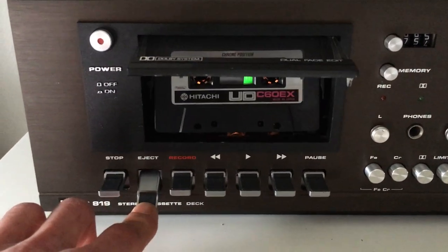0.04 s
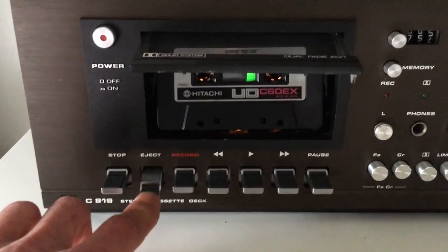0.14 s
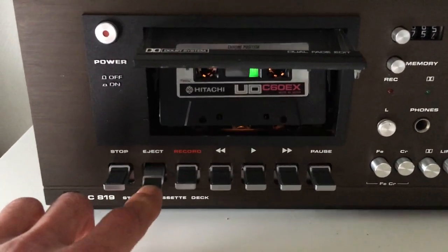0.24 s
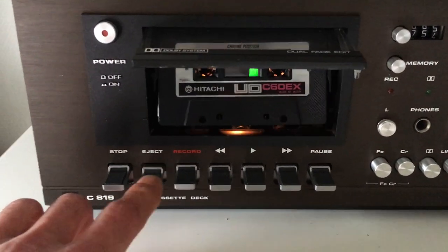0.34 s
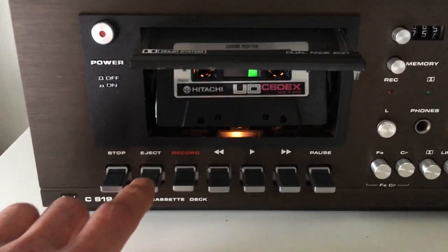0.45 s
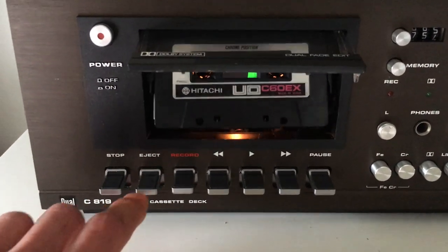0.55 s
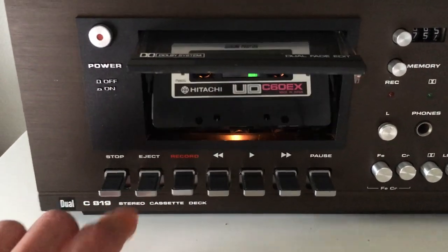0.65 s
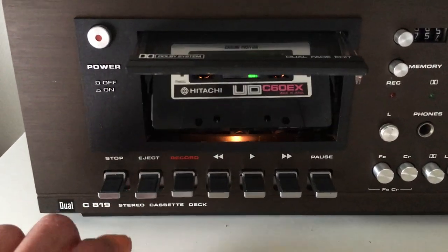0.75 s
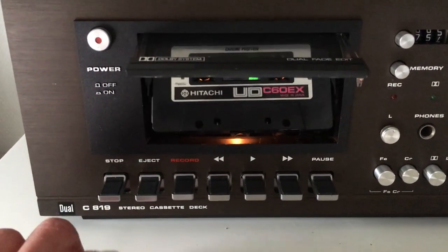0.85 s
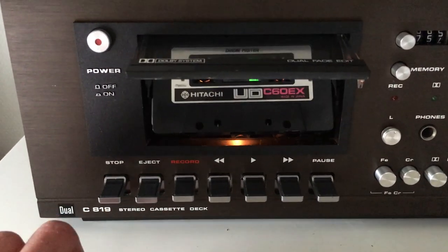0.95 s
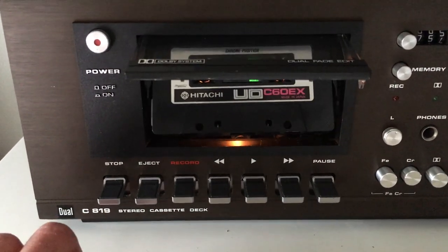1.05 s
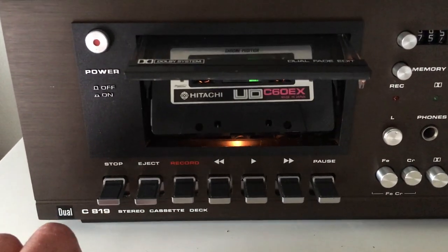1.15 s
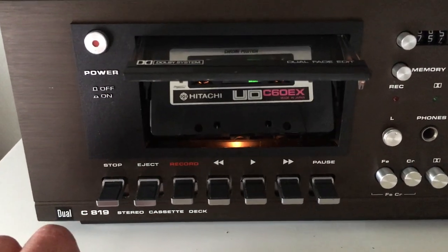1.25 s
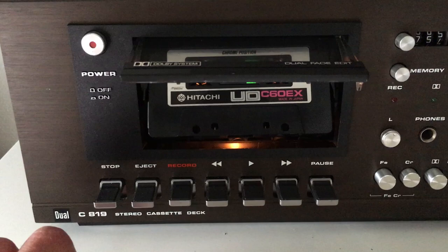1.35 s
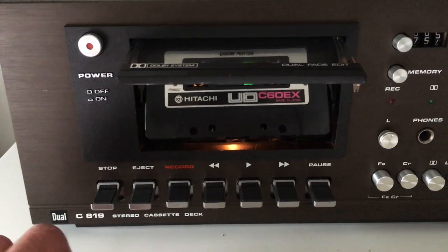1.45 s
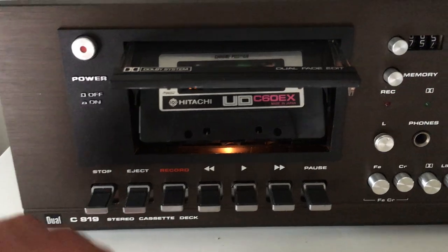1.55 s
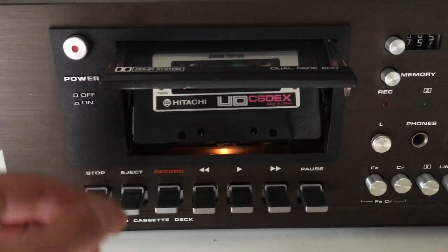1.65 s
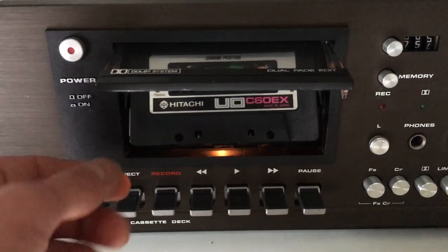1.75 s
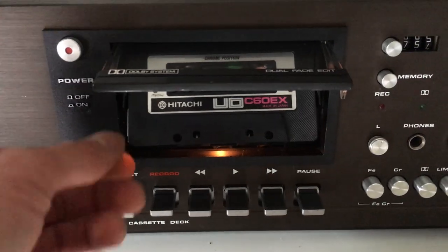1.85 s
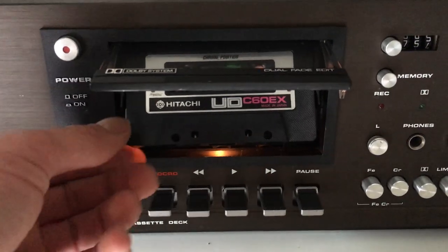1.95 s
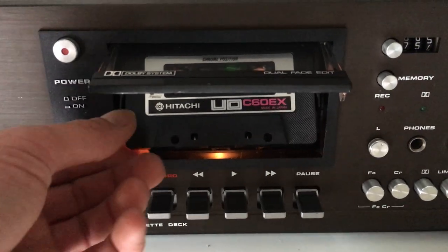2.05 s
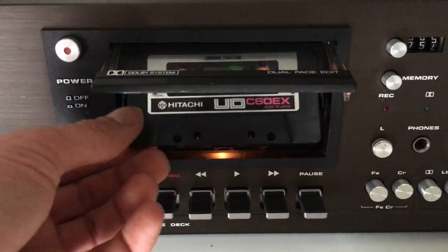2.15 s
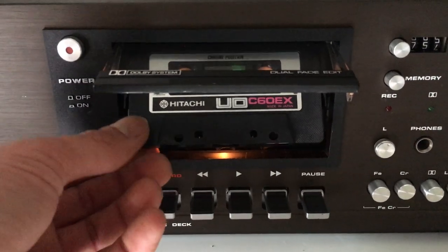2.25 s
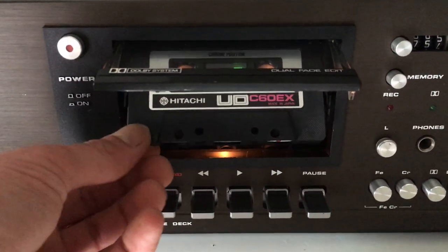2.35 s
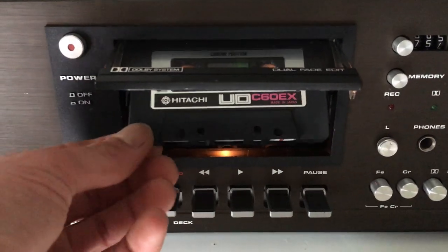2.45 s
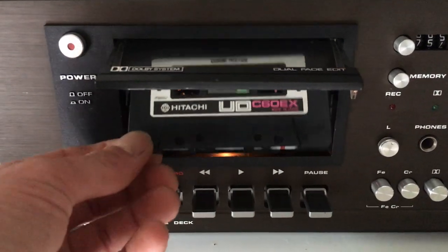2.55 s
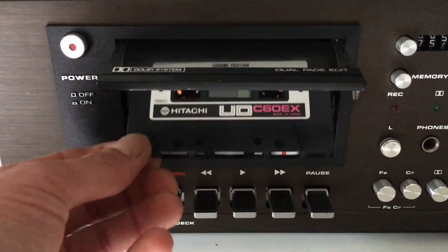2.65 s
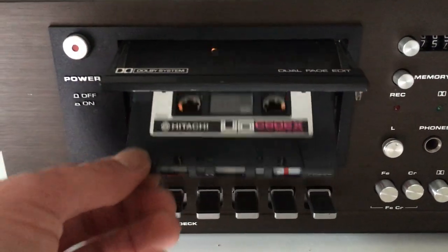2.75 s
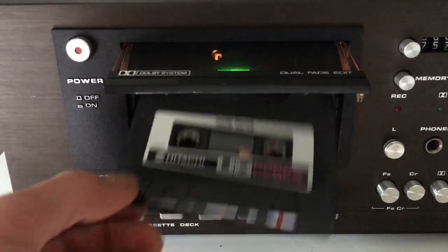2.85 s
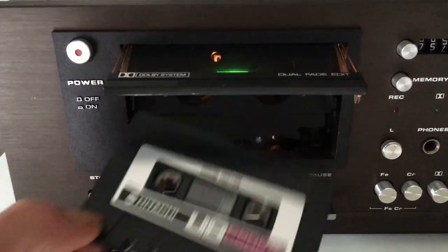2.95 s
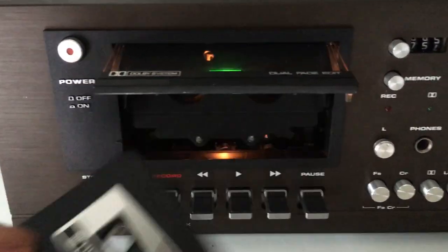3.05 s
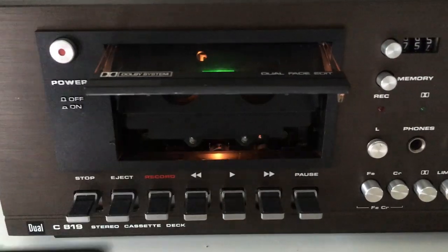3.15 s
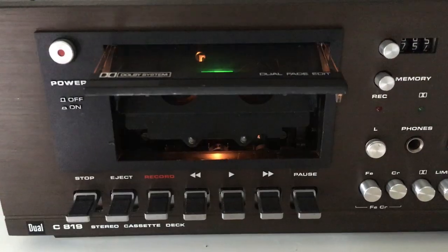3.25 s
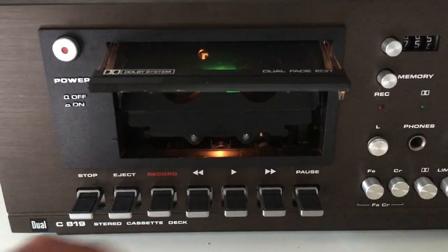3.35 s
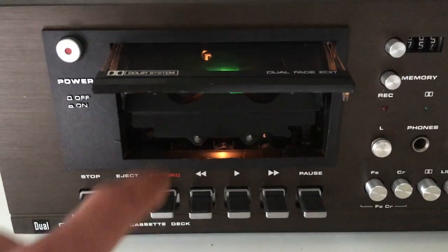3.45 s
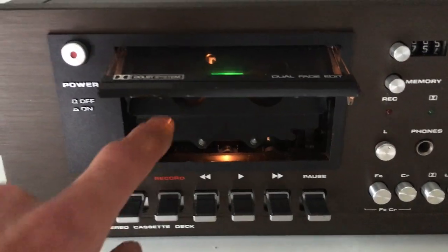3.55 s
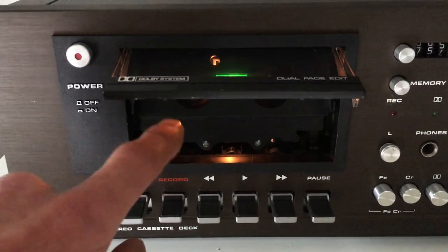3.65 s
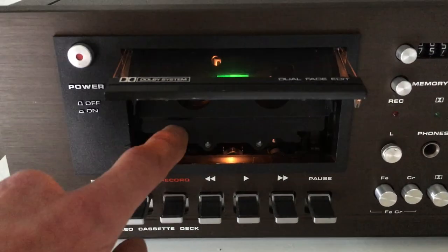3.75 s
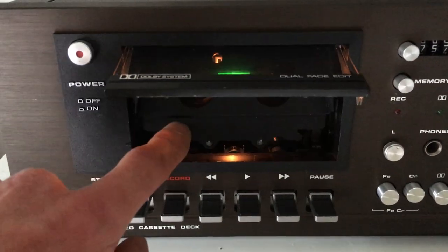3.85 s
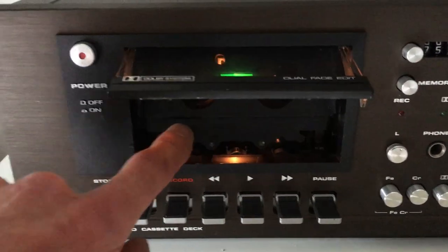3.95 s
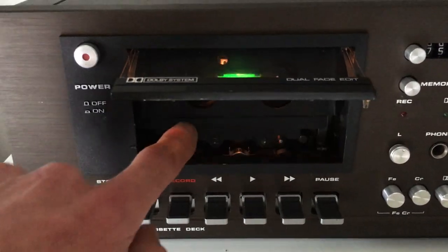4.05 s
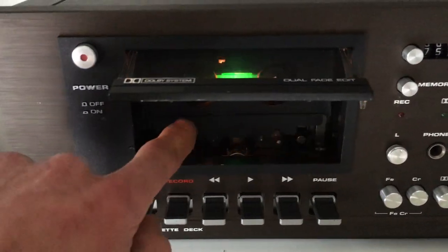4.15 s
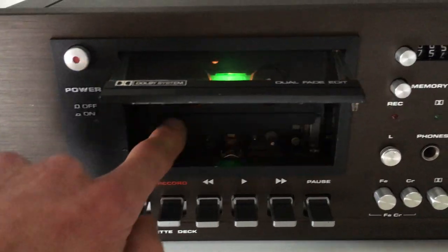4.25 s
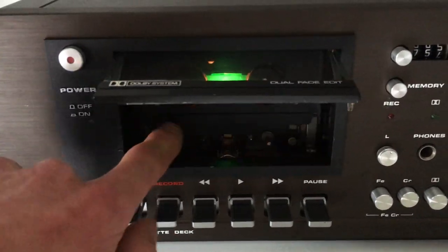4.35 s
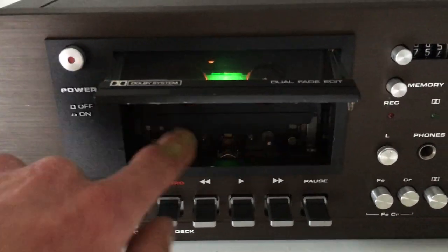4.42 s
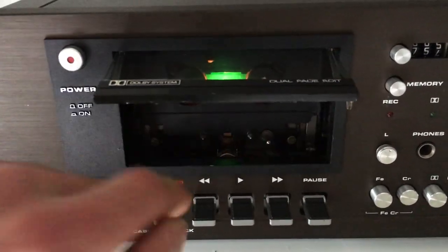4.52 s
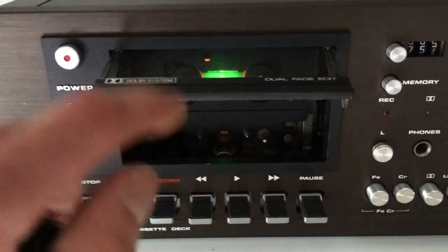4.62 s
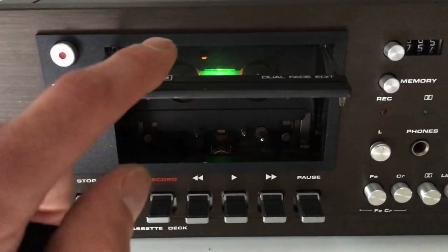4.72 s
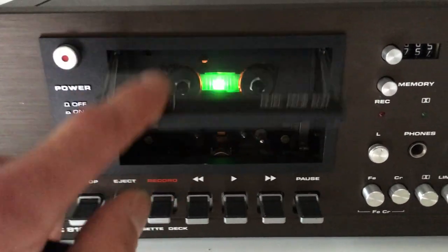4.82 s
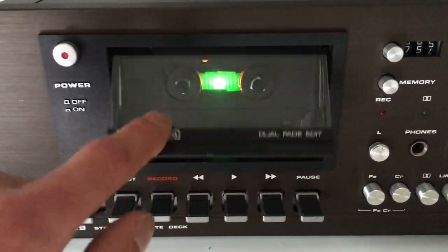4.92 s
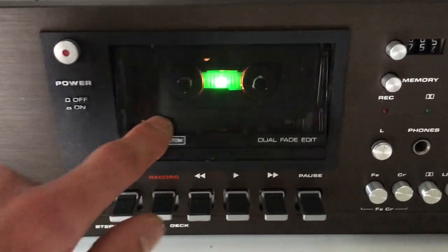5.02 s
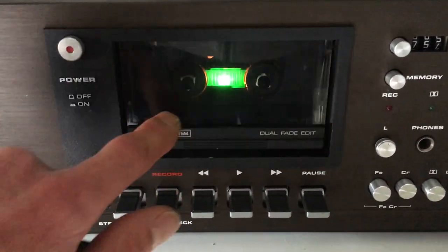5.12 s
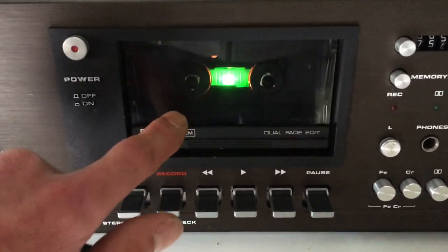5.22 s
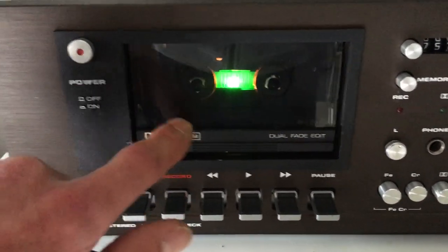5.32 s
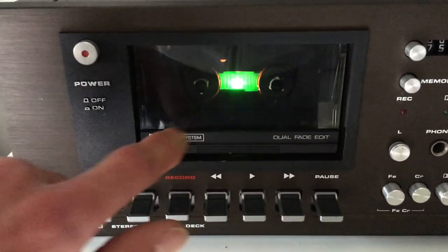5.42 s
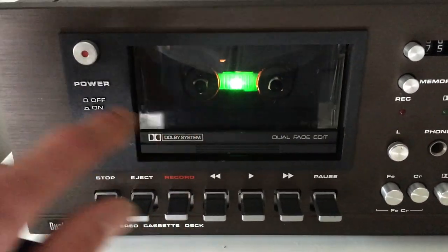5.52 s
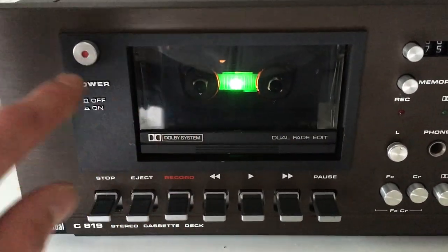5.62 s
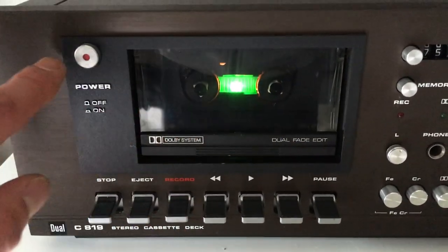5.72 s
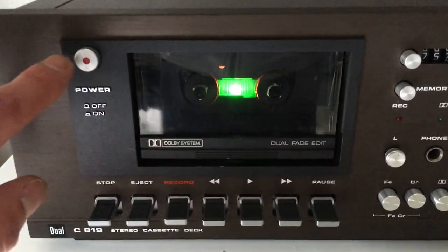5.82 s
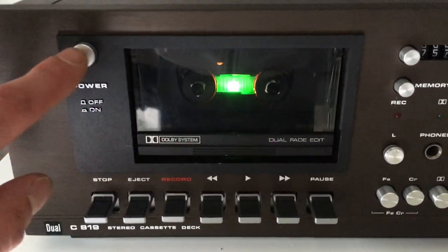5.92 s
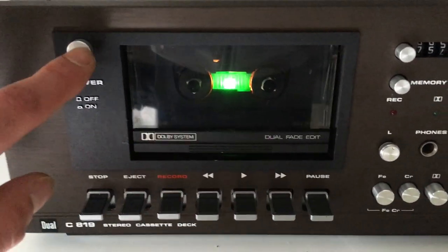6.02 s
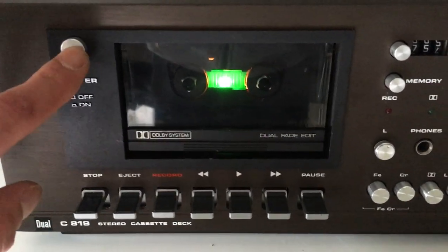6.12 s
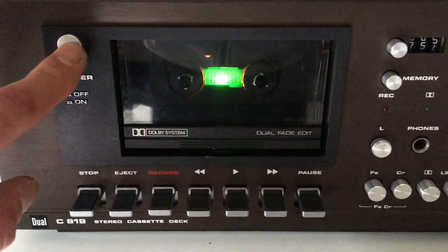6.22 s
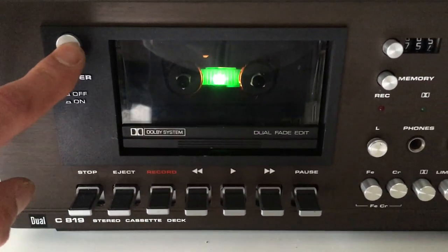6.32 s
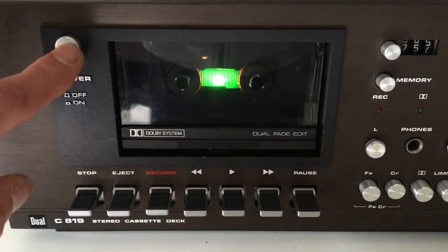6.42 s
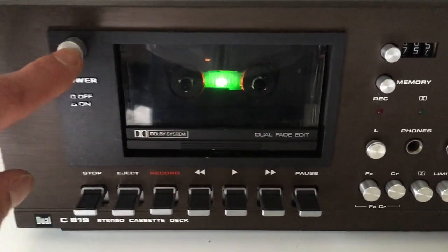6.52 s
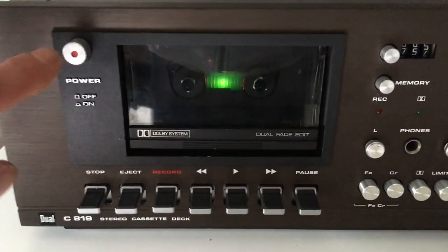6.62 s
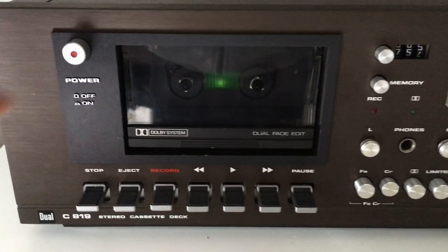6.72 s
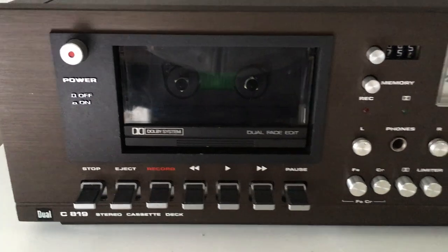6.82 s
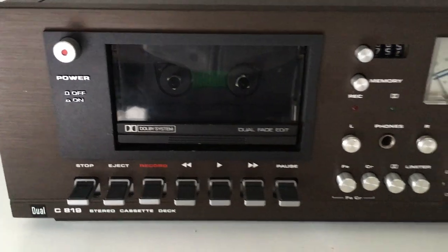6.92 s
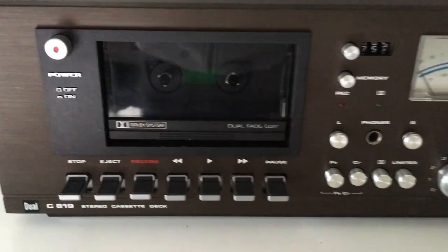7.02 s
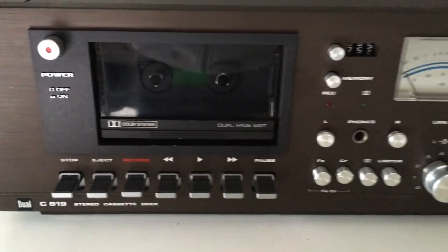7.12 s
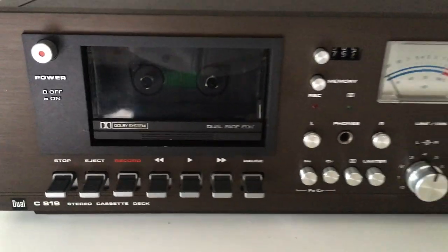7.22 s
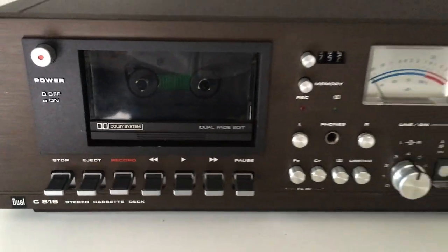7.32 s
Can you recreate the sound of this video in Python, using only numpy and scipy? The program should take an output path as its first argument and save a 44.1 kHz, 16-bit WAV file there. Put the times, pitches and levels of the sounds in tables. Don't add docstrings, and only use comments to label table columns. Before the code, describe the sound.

Close mechanical clicks in a quiet room: eject key, spring thump, plastic tape sliding out, one very loud snap, door clack, switch press and release.

```python
import sys
import numpy as np
from scipy import signal
from scipy.fft import rfft, irfft, next_fast_len
from scipy.io import wavfile
from scipy.ndimage import uniform_filter1d, map_coordinates

SR = 44100
rng = np.random.default_rng(int(sys.argv[2]) if len(sys.argv) > 2 else 0)


def boost_factor(decibels):
    exponent = np.asarray(decibels, float) / 20
    return 10 ** exponent


def log_audio(samples):
    frames = np.atleast_2d(samples).T
    limited = np.clip(frames, -1, 1)
    pcm = np.round(limited * 32767).astype(np.int16)
    wavfile.write(sys.argv[1], SR, pcm)


N = 325017
HZ = np.fft.rfftfreq(next_fast_len(N + SR), 1 / SR)

# low edge f/Hz, high edge f/Hz
BANDS = [(9000, 19000), (4500, 9000), (1200, 4500), (280, 1200)]
# f/Hz, width/Hz, level/dB
HAND_BODY = [(1390, 220, 4.7), (2000, 410, 9), (4300, 55, 1.8), (6860, 420, 10.7), (9040, 1200, 6.6),
             (13400, 3100, 8.8)]
# f/Hz, width/Hz, level/dB
SWITCH_BODY = [(1000, 33, 17), (1645, 45, 21.6), (1980, 140, 14.4), (2560, 400, 20.6), (3750, 310, 11),
               (5960, 360, 18.5), (7250, 1700, 7.7), (9550, 340, 16.7), (11300, 610, 11.6),
               (13900, 1700, 16.5)]


def unit(x):
    return x / np.sqrt(np.mean(np.abs(x) ** 2) + 1e-20)


def along(points, hz):
    f, v = np.transpose(points)
    return np.interp(np.log(hz + 1), np.log(f + 1), v)


def filtered(x, response):
    m = 2 * (len(HZ) - 1)
    return irfft(rfft(x, m) * response, m)[..., :N]


def wobble(rate):
    knots = rng.standard_normal(int(N * rate / SR) + 4)
    return map_coordinates(knots, [np.arange(N) * rate / SR])


def band_edge(u):
    return 1 / (1 - u * u + 1j * np.sqrt(2) * u)


def voiced(drive, body):
    response = 1
    for k, (center, width, db) in enumerate(body):
        damping = 1j * HZ * width
        response = response + (-1) ** k * boost_factor(db) * damping / (center * center - HZ * HZ + damping)
    split = []
    for low, high in BANDS:
        band = band_edge(HZ / high / 1.12) * band_edge(-low / 1.13 / (HZ + 1))
        split.append(unit(response * band ** 2))
    return filtered(drive, np.array(split)).sum(axis=0)


def struck(contacts, body, rattle_s, snap_db, knock_db, rise_s=0.00039):
    drive = np.zeros((len(BANDS), N + SR))
    t = np.arange(SR // 10) / SR
    noise = rng.standard_normal((len(contacts), len(BANDS), len(t)))
    t60 = rattle_s * np.array([[.58], [.75], [1.1], [1.5]])
    for (s, db, hard_db, thud_db), grit in zip(contacts, noise):
        start = round(s * SR)
        level_db = np.array([db + hard_db, db + snap_db, db - hard_db, thud_db])
        fade = boost_factor(level_db[:, None] + 1.5 - 60 * t / t60)
        drive[:, start:start + len(t)] += fade * (1 - np.exp(-t / rise_s)) * grit
        drive[:, start] += boost_factor(level_db + knock_db)
    return voiced(drive[:, :N], body)


def slid(strokes, body, rough_db, air_db, low_db):
    ease_db = 18
    drive = np.zeros((len(BANDS), N))
    t = np.arange(N) / SR
    for start, firmest, end, db, hard_db in strokes:
        press_db = np.interp(t, [start, firmest, end], [-ease_db, 0, -ease_db], left=-120, right=-120)
        drive += boost_factor(db + press_db) * boost_factor([[hard_db + air_db], [hard_db], [0], [low_db - hard_db]])
    slips = unit(boost_factor(rough_db * wobble(300)))
    return voiced(drive * slips * rng.standard_normal(drive.shape), body)


def ringing(modes, beat_db, beat_rate, wander):
    out = np.zeros(N + SR)
    t = np.arange(SR) / SR
    knots = rng.standard_normal((len(modes), 2, 128))
    place = [np.clip(t * beat_rate, 0, 126)]
    for (s, db, hz, rise, t60), rows in zip(modes, knots):
        beat, turn = (map_coordinates(row, place) for row in rows)
        swell = boost_factor(db + beat_db * beat - 60 * t / t60) * (1 - np.exp(-t / rise))
        start = round(s * SR)
        out[start:start + SR] += swell * np.sin(2 * np.pi * hz * t + wander * turn)
    return out[:N]


def pushed(*parts):
    return [(s, db + mode_db, hz, rise, t60)
            for modes, pushes in parts
            for s, db, rise in pushes
            for hz, mode_db, t60 in modes]


def tray_snap():
    # t/s, strength/dB, hardness/dB, thud/dB
    tray_hits = [(3.772, -66.5, -5, -56), (3.868, -71, 11, -76), (4.005, -73, 2, -56),
                 (4.2213, -55, 8, -69.5), (4.2255, -58, 8.5, -63.5), (4.228, -54, 6, -59.5),
                 (4.234, -58.5, 3, -53), (4.2398, -37, 1, -46), (4.2412, -26, 6, -39.5),
                 (4.2442, -14.5, 8, -32), (4.2465, -18, 9, -29), (4.2488, -21, 4.5, -28.5),
                 (4.2512, -14.5, 6, -29), (4.2525, -15.5, 8.5, -36), (4.2543, -27, 4, -35),
                 (4.258, -26.5, 1.5, -32.5), (4.2615, -31, 3, -38.5)]
    # f/Hz, width/Hz, level/dB
    tray_body = [(417.6, 490, 2.5), (808.5, 58, 4.5), (1640, 120, 4.5), (2000, 220, 10), (2320, 250, 8),
                 (3900, 420, 11), (5587, 400, 1.5), (6400, 440, 8.5), (7900, 690, 4), (9560, 900, 9),
                 (11775, 890, 8.5), (14740, 1900, 8)]
    return struck(tray_hits, tray_body, rattle_s=0.015, snap_db=3.0, knock_db=11.5)


def eject_key():
    # t/s, strength/dB, hardness/dB, thud/dB
    key_hits = [
        (.161, -64, 9, -71),
        (.199, -79, -6, -58.5),
        (.2435, -66, -9.5, -54.5),
        (.2485, -74, -5.5, -57),
        (.3788, -49.5, 4.5, -62.5),
        (.398, -64.5, -5, -56.5),
        (.4055, -60, -2.5, -61),
        (.4145, -21, 4.5, -41),
        (.4185, -35, 5.5, -40),
    ]
    # f/Hz, width/Hz, level/dB
    key_body = [(1420, 350, -7.5), (2274, 150, 14), (3040, 130, 12), (4420, 190, 16), (5700, 250, 12.5),
                (6890, 690, 12.5), (8550, 530, 12), (10200, 600, 10.5), (11300, 930, 7), (13550, 900, 16)]
    return struck(key_hits, key_body, rattle_s=0.02, snap_db=0.0, knock_db=14.0)


def spring_lift():
    # t/s, strength/dB, hardness/dB, thud/dB
    lift_hits = [(.6195, -46.5, 3, -47), (.633, -52, 1, -42), (.6395, -48, 4, -42),
                 (.642, -50.5, 18, -41.5), (.648, -32, -4, -54), (.651, -43, -10, -50.5),
                 (.6567, -27.5, -3.5, -36.5), (.662, -41, -5, -42), (.667, -39, -1.5, -34.5),
                 (.672, -50, -1, -48), (.6805, -42, -2, -63), (.69, -49, -6, -60), (.6975, -60, 5, -67),
                 (.82, -65, -9, -69)]
    # f/Hz, width/Hz, level/dB
    lift_body = [(646, 71, 13.6), (970, 290, 12), (1750, 640, 13.4), (1880, 220, 19.2), (3300, 350, 1.7),
                 (4870, 130, 8.6), (5300, 370, 2), (8140, 140, 1), (13030, 1400, 4.1)]
    return struck(lift_hits, lift_body, rattle_s=0.019, snap_db=2.5, knock_db=16.5)


def door_shut():
    # t/s, strength/dB, hardness/dB, thud/dB
    door_hits = [(4.8512, -57, -6.5, -57), (4.857, -54.5, 2, -56), (5.081, -72, 9, -82.5),
                 (5.1238, -38, 4, -53), (5.1565, -45, -5, -47), (5.1618, -26, 3.5, -46),
                 (5.1635, -31.5, -4, -46), (5.1645, -30.5, -0.5, -48), (5.168, -44, -8, -60),
                 (5.171, -51, -5, -41), (5.3535, -60, -3, -54)]
    # f/Hz, width/Hz, level/dB
    door_body = [(984, 54, 8.3), (1286, 77, 10.1), (1620, 276, 6.7), (2400, 190, 16.6), (3620, 180, 8.05),
                 (4220, 210, 6.9), (5430, 240, 1), (11060, 400, 12), (14300, 1200, 4.4)]
    return struck(door_hits, door_body, rattle_s=0.019, snap_db=0.0, knock_db=13)


def power_press():
    # t/s, strength/dB, hardness/dB, thud/dB
    press_hits = [
        (6.19, -82, -4.5, -70),
        (6.2478, -33.5, 9.5, -47.5),
        (6.252, -35, 7, -48),
    ]
    return struck(press_hits, SWITCH_BODY, rattle_s=0.035, snap_db=-5.0, knock_db=15.0)


def power_release():
    # t/s, strength/dB, hardness/dB, thud/dB
    release_hits = [
        (6.4505, -68, -3, -65),
        (6.497, -78, 5, -64),
        (6.5182, -64, 1, -78),
        (6.5515, -50.5, 4, -57),
        (6.556, -38.5, 6, -47),
        (6.57, -55, -4.5, -38),
    ]
    # start t/s, firmest t/s, end t/s, pressure/dB, hardness/dB
    plunger = [
        (6.445, 6.455, 6.77, -72.5, -5),
        (6.5, 6.553, 6.557, -67, 7.5),
    ]
    # f/Hz, width/Hz, level/dB
    plunger_body = [(657, 21, 7), (1002, 81, 17.7), (1760, 570, 8.5), (2500, 790, 15.9), (5700, 660, 4.1),
                    (13400, 2600, 13.6)]
    knocks = struck(release_hits, plunger_body, rattle_s=0.059, snap_db=-1.5, knock_db=1)
    return knocks + slid(plunger, plunger_body, rough_db=2.5, air_db=-8, low_db=-1.0)


def tape_pull():
    # t/s, strength/dB, hardness/dB, thud/dB
    tape_hits = [(2.375, -71, 0, -62.5), (2.4, -71, 8, -61), (2.452, -66, 2, -71), (2.4628, -57, 4, -49.5),
                 (2.4718, -38, 4.5, -53), (2.478, -37.5, 2, -44), (2.4825, -61, 2, -50),
                 (2.5485, -35.5, 4.5, -67), (2.5545, -37, 6.5, -52), (2.571, -53, -6, -48.5),
                 (2.5775, -67, 5, -48), (2.6025, -69, 2, -56), (2.624, -58, 0, -76),
                 (2.6872, -51.5, -5.5, -47.5), (2.695, -56, 6, -50), (2.712, -73, -10, -47.5),
                 (2.759, -67, 2, -69)]
    # f/Hz, width/Hz, level/dB
    tape_body = [(630, 25, 5.9), (1300, 550, 9.2), (2150, 1300, 2.5), (3220, 68, 13), (4370, 330, 4.1),
                 (6100, 1000, 13), (8800, 280, 15), (11400, 1200, 11.6), (14400, 520, 2.5)]
    return struck(tape_hits, tape_body, rattle_s=0.028, snap_db=-0.5, knock_db=7)


def tape_slide():
    # start t/s, firmest t/s, end t/s, pressure/dB, hardness/dB
    scrapes = [(2.485, 2.49, 2.74, -76, -26), (2.55, 2.572, 2.75, -62.5, -7), (2.6, 2.642, 2.48, -73, 17),
               (2.74, 2.785, 2.81, -58.5, -19.5), (2.75, 2.8, 2.74, -61.5, 3.5),
               (2.79, 2.822, 2.85, -55, -14), (2.8, 2.84, 2.91, -52.5, -14),
               (2.81, 2.888, 2.896, -50, -4.5), (2.84, 2.865, 2.87, -56, -2), (2.88, 2.897, 2.94, -67, -19)]
    # start t/s, firmest t/s, end t/s, pressure/dB, hardness/dB
    rustles = [(3.165, 3.195, 3.23, -64, 3), (3.245, 3.255, 3.43, -66.5, -1), (3.27, 3.298, 3.2, -84, -3),
               (3.35, 3.4, 3.43, -69.5, -5), (3.425, 3.447, 3.45, -70, 5)]
    # f/Hz, width/Hz, level/dB
    shell_body = [(630, 120, 15), (1452, 102, 23.4), (2030, 240, 11), (2490, 120, 16.2), (4130, 280, 6.7),
                  (6200, 1700, 7.3), (9650, 400, 6.6), (11900, 1200, 9.6)]
    scrape = slid(scrapes, shell_body, rough_db=1.5, air_db=-7.0, low_db=-12.5)
    return scrape + slid(rustles, HAND_BODY, rough_db=3.0, air_db=2.5, low_db=-3.5)


def tape_grip():
    # t/s, strength/dB, hardness/dB, thud/dB
    grip_hits = [
        (2.0905, -61, 2.5, -62),
        (2.2042, -46, -6.5, -46.5),
        (2.215, -59, -3, -60),
        (2.28, -73, 6, -80),
    ]
    # f/Hz, width/Hz, level/dB
    grip_body = [(850, 200, 4.3), (1450, 120, 15.5), (2080, 240, 13), (2790, 630, 10.6), (9000, 410, 2.8),
                 (12600, 1500, 8)]
    return struck(grip_hits, grip_body, rattle_s=0.017, snap_db=0, knock_db=15.5)


def tape_fumble():
    # t/s, strength/dB, hardness/dB, thud/dB
    fumble_hits = [(3.054, -63.5, 2, -77), (3.1805, -59.5, -4.5, -68), (3.199, -73, 1, -72),
                   (3.2952, -61, 17, -69), (3.3452, -58.5, -8, -62), (3.4335, -61, 0, -64),
                   (3.442, -54.5, 2, -68.5), (3.451, -64, -1, -62)]
    return struck(fumble_hits, HAND_BODY, rattle_s=0.017, snap_db=-2.5, knock_db=12.5)


def shell_creaks():
    # t/s, peak level/dB, f/Hz
    creaks = [(3.18, -54, 1400), (3.201, -48, 1300), (3.21, -56, 1240), (3.208, -65, 2030),
              (3.223, -61, 2000), (3.252, -54, 1371), (3.275, -55, 1450), (3.281, -60, 1300),
              (3.305, -60, 1580), (3.318, -65, 1520), (4.004, -50, 723)]
    rise_s, t60_s = .002, .045
    return ringing([(*row, rise_s, t60_s) for row in creaks], beat_db=3.5, beat_rate=215, wander=.45)


def panel_touch():
    # t/s, strength/dB, hardness/dB, thud/dB
    taps = [
        (.97, -66, -1, -67),
        (1.522, -75, -6, -71),
        (1.6295, -43.5, 3, -74),
        (1.653, -68, -4, -82),
    ]
    # f/Hz, width/Hz, level/dB
    tap_body = [(1960, 200, 6), (3070, 470, 18), (3800, 560, 9.6), (5700, 850, 7.5), (9300, 1300, 4),
                (12500, 2200, 11)]
    # start t/s, firmest t/s, end t/s, pressure/dB, hardness/dB
    rubs = [
        (1.53, 1.57, 1.62, -75.5, -16),
    ]
    tapping = struck(taps, tap_body, rattle_s=0.012, snap_db=2.0, knock_db=-2.0)
    return tapping + slid(rubs, HAND_BODY, rough_db=6.0, air_db=-5, low_db=-9)


def switch_touch():
    # start t/s, firmest t/s, end t/s, pressure/dB, hardness/dB
    rests = [
        (5.85, 6.08, 6.08, -76.5, -18),
        (6.05, 6.16, 6.35, -76, -23),
    ]
    return slid(rests, SWITCH_BODY[:2], rough_db=4.0, air_db=-6, low_db=-24.5)


def loose_parts():
    # t/s, peak level/dB, f/Hz, rise/s, t60/s
    lone_rings = [
        (2.92, -56.5, 1480, 0.008, 0.39),
        (2.89, -71, 2600, .005, 0.26),
        (6.573, -39.5, 651, 0.0031, 0.097),
        (6.605, -60, 630, 0.0092, 0.41),
        (6.6, -69, 1666, 0.11, 0.77),
    ]
    # (t/s, peak level/dB, rise/s)
    key_ring = ([(1400, -2.5, 0.36), (1710, -5, .3), (2380, -1.5, .18), (2430, -4.5, 0.18),
                 (2970, -0.5, 0.25), (3050, -1, .3), (3450, -2, .12), (4330, -6, 0.25), (5700, -2.5, 0.26),
                 (5550, -7, .25), (611, -2, 0.18)], [(.416, -49.5, 0.0034)])
    # (t/s, peak level/dB, rise/s)
    lift_ring = ([(1870, -2, 0.31), (1660, -2.5, 0.59), (1710, -7, 0.59), (1403, -8, 0.52),
                  (2810, -8, 0.33)], [(.655, -48, 0.0041)])
    # (t/s, peak level/dB, rise/s)
    tray_ring = ([(2000, -2.5, 0.47), (2460, 0.5, .4), (1300, -5.5, .4), (747, -2.5, 0.21),
                  (6337, 0.5, .35), (6460, -2.5, .3), (9200, -4, .25), (3600, -4.5, .3)],
                  [(4.25, -42.5, .004)])
    # (t/s, peak level/dB, rise/s)
    reel_ring = ([(2060, -4, 0.22), (2540, -10, 0.23), (1600, -6, 0.28)], [(2.208, -59.5, .015)])
    # (t/s, peak level/dB, rise/s)
    door_ring = ([(1665, 0, 0.14), (2380, 0.92, 0.132), (1300, 0, 0.24), (642, 0, .2)],
                  [(4.853, -68, 0.0039), (5.164, -45.5, 0.0034)])
    # (t/s, peak level/dB, rise/s)
    latch_ring = ([(2560, -2, 0.36), (2530, -1, 0.31), (2250, -1, 0.2), (6000, -4, 0.23), (6150, -10, 0.28),
                   (6400, -7, 0.26)], [(6.262, -54, .015)])
    rings = lone_rings + pushed(key_ring, lift_ring, tray_ring, reel_ring, door_ring, latch_ring)
    return ringing(rings, beat_db=4.0, beat_rate=90, wander=.75)


def switch_ring():
    # (t/s, peak level/dB, rise/s)
    plate = ([(968, 0, 0.068)], [(6.04, -56, .01), (6.187, -54, .003), (6.251, -34.5, 0.002),
              (6.29, -48, .01), (6.495, -47.5, .0045), (6.508, -48, 0.0037), (6.54, -53, .005),
              (6.569, -29, 0.0034), (6.62, -42, 0.0088), (6.71, -51.5, 0.011), (6.79, -60.5, .01)])
    return ringing(pushed(plate), beat_db=2.5, beat_rate=81, wander=.35)


def cabinet_boom():
    # t/s, peak level/dB, f/Hz, rise/s, t60/s
    booms = [
        (.74, -50, 167, 0.047, 0.65),
        (2.49, -45, 57.5, 0.0094, .24),
        (4.242, -30.5, 138, .0029, .12),
        (4.243, -42.5, 126.4, 0.037, 0.98),
        (4.244, -39, 173.5, 0.0035, 0.34),
        (4.243, -41.5, 204.4, .003, 0.27),
        (4.244, -40.5, 304.5, 0.0041, 0.34),
        (4.245, -43.5, 510, .003, 0.12),
        (4.245, -46, 454, .006, 0.55),
        (4.245, -46.5, 268, .005, .35),
    ]
    # (t/s, peak level/dB, rise/s)
    case = ([(129.2, -4, 0.35)], [(.43, -41.5, 0.0097), (.659, -36, 0.034), (1.58, -48.5, 0.013),
             (2.495, -34.5, 0.028), (2.56, -37, 0.0056), (4.861, -39.5, 0.022), (5.165, -38, 0.028),
             (6.26, -43, 0.024), (6.57, -40, 0.018)])
    # (t/s, peak level/dB, rise/s)
    front = ([(210.1, 0.0054, .3)], [(.43, -46, 0.01), (.661, -41, 0.0094), (2.18, -55.5, 0.035),
              (2.42, -52, 0.026), (2.7, -52, .015), (2.801, -32.5, 0.18), (6.08, -48.5, 0.032),
              (6.19, -44.5, 0.0081), (6.569, -37, 0.016), (6.66, -44, 0.014)])
    # (t/s, peak level/dB, rise/s)
    lid = ([(298, 0.0034, 0.098)], [(.43, -41, 0.0062), (2.49, -66, 0.026), (5.165, -52, 0.008),
            (6.62, -38.5, 0.013)])
    return ringing(booms + pushed(case, front, lid), beat_db=2.5, beat_rate=35, wander=1.0)


def spectrum(x):
    return signal.stft(x, SR, nperseg=256, noverlap=192)


def room(parts, late_db, late_stretch, ripple_db):
    # f/Hz, t60/s
    decay = [(300, 0.42), (1000, 0.31), (2500, 0.44), (6000, .42), (10000, 0.33), (15000, 0.31)]
    # f/Hz, level/dB
    room_feed = [(300, -1), (2200, -0.5), (6000, -2), (10000, -3.5), (15000, -9.5)]
    modes = map_coordinates(rng.standard_normal(800), [HZ / 30])
    hz, t, noise = spectrum(filtered(rng.standard_normal(N), boost_factor(ripple_db * modes)))
    sent = sum(boost_factor(wet_db) ** 2 * np.abs(spectrum(x)[2]) ** 2 for x, wet_db in parts)
    sent = uniform_filter1d(sent, size=5, axis=0) * boost_factor(2 * along(room_feed, hz))[:, None]
    held = 0
    for share, stretch in [(1, 1), (boost_factor(2 * late_db), late_stretch)]:
        left = boost_factor(-120 * t[1] / (stretch * along(decay, hz)))
        tail = [signal.lfilter([0, 0, 0, 1 - k], [1, -k], row) for k, row in zip(left, sent)]
        held = held + share * np.array(tail)
    return signal.istft(np.sqrt(np.abs(held)) * unit(noise), SR, nperseg=256, noverlap=192)[1][:N]


def background():
    # f/Hz, level per Hz/dB
    rumble_tone = [(10, -69.5), (22, -35.5), (33, -20), (45, 0), (98, -4.5), (125, -12), (245, -11.5),
                   (280, -19), (312, -11), (372, -24.5), (500, -37.5), (650, -56.5), (1100, -120)]
    # f/Hz, level per Hz/dB
    hiss_tone = [(210, -28.5), (400, -4), (700, -3.5), (1500, -9), (2300, -11), (4000, -15.5), (5000, -19),
                 (6200, -14), (7800, -18.5), (9300, -13.5), (10400, -17.5), (11800, -11.5), (15600, -13)]
    rumble = filtered(rng.standard_normal(N), boost_factor(along(rumble_tone, HZ)))
    rumble = unit(rumble * boost_factor(1.2 * wobble(1.9)))
    hiss = filtered(rng.standard_normal(N), boost_factor(along(hiss_tone, HZ)))
    hiss = unit(hiss * boost_factor(0.48 * wobble(10.0)))
    return boost_factor(-62) * rumble + boost_factor(-70.5) * hiss


def scene():
    parts = [(tray_snap(), -8.1),
             (eject_key(), -8.1),
             (spring_lift(), -9.1),
             (door_shut(), -11),
             (power_press(), -8.1),
             (power_release(), -7),
             (tape_pull(), -9.1),
             (tape_slide(), -12.1),
             (tape_grip(), -9),
             (tape_fumble(), -11),
             (shell_creaks(), -13),
             (panel_touch(), -9),
             (switch_touch(), -12),
             (loose_parts(), -14),
             (switch_ring(), -14),
             (cabinet_boom(), -9.1)]
    direct = sum(x for x, _ in parts)
    reverb = room(parts, late_db=-14.0, late_stretch=2.1, ripple_db=1.0)
    return (direct + reverb + background())[None]


def low_pass(x):
    return signal.sosfilt(signal.butter(12, 17000, fs=SR, output="sos"), x)


def record(dry):
    # f/Hz, level/dB
    band_limit = [(15650, 0), (15950, -22), (16700, -40), (17000, -90)]
    soft = dry / (1 + np.abs(dry / .8) ** 4) ** (1 / 4)
    return low_pass(filtered(soft, boost_factor(along(band_limit, HZ))))


dry = scene()
out = record(dry)
log_audio(out)
```